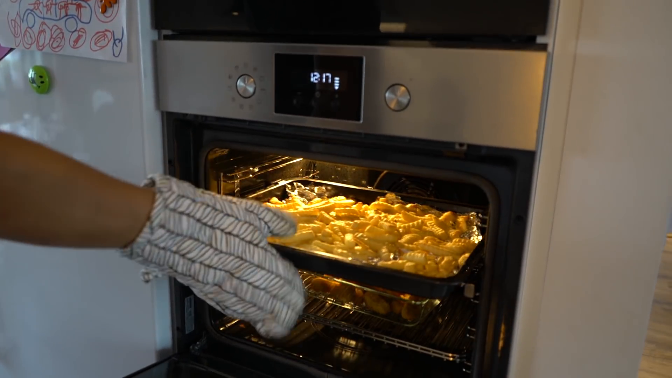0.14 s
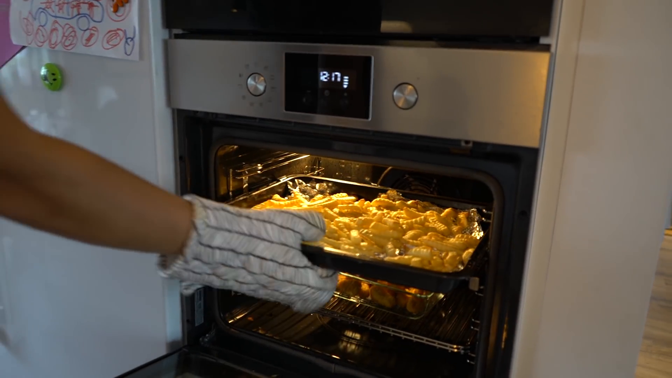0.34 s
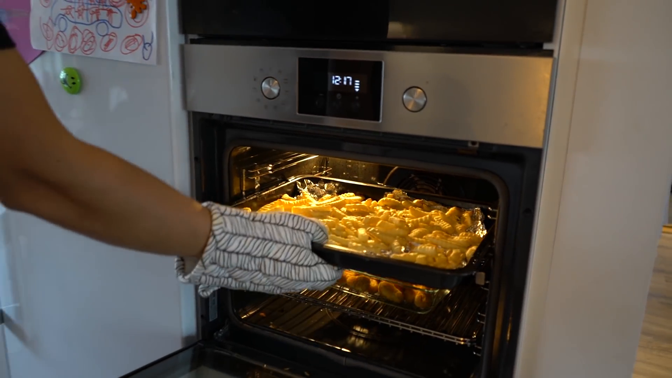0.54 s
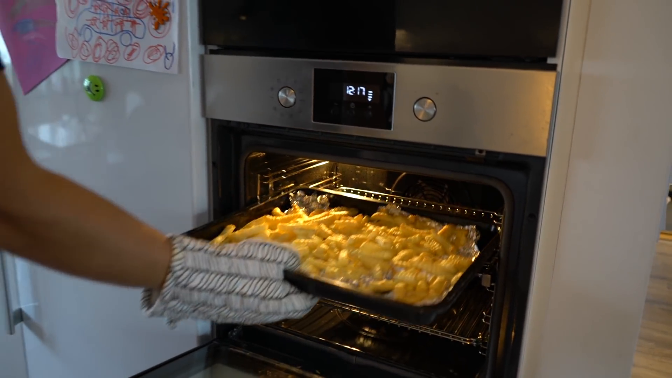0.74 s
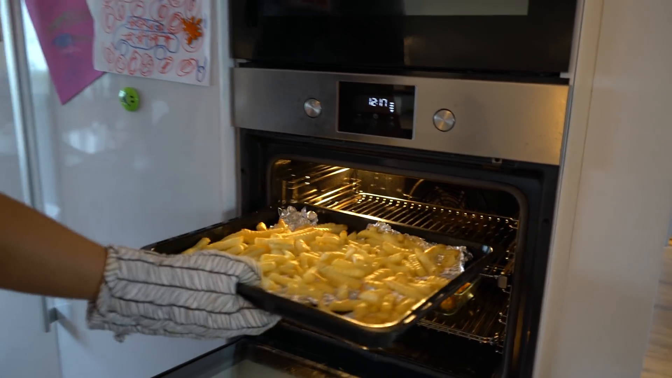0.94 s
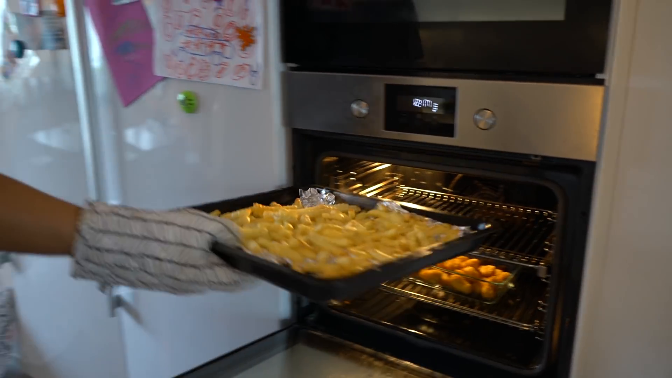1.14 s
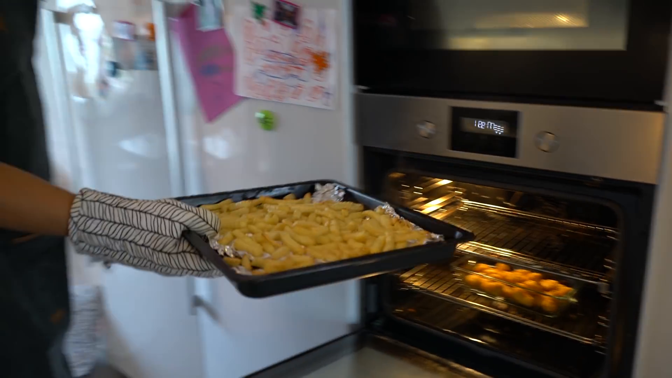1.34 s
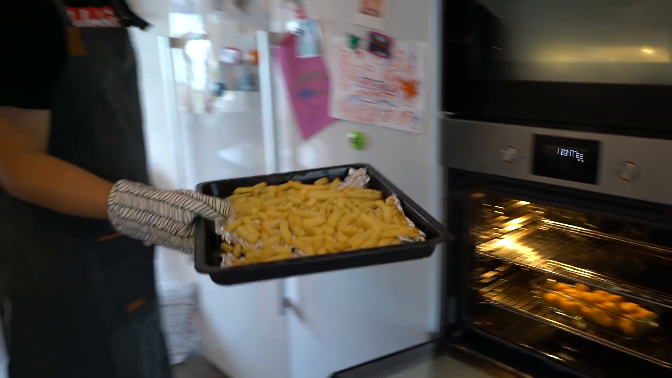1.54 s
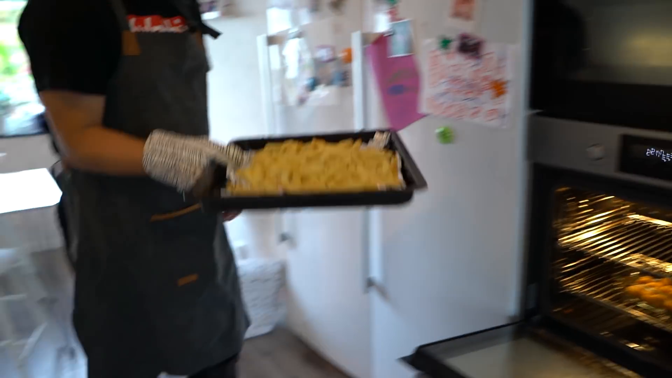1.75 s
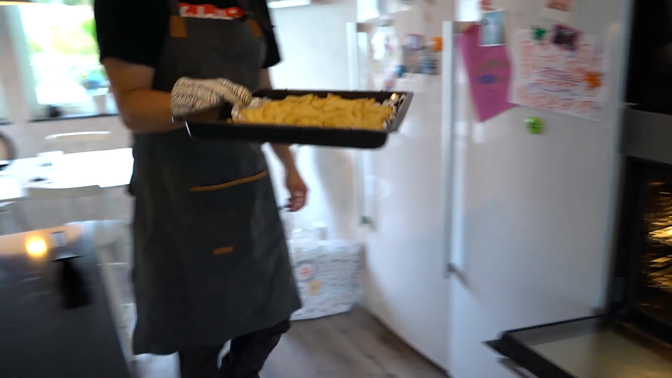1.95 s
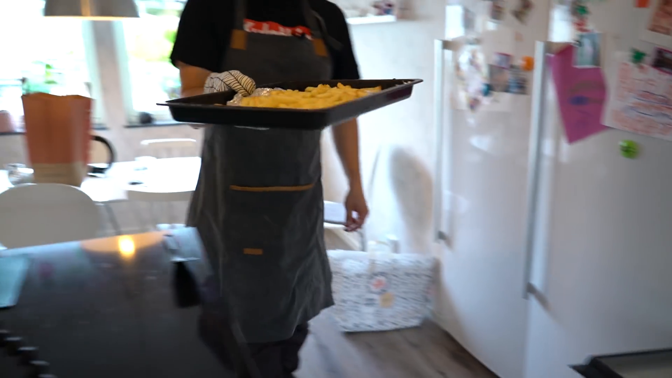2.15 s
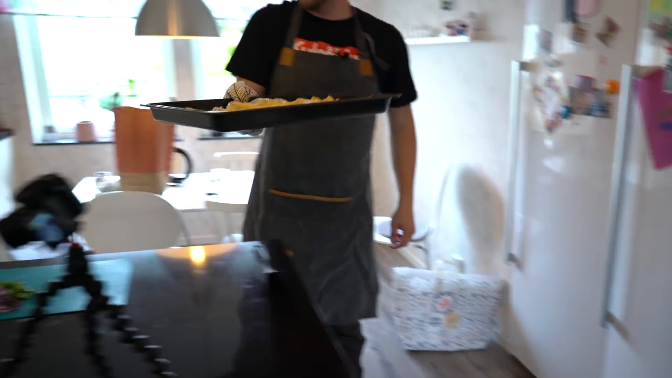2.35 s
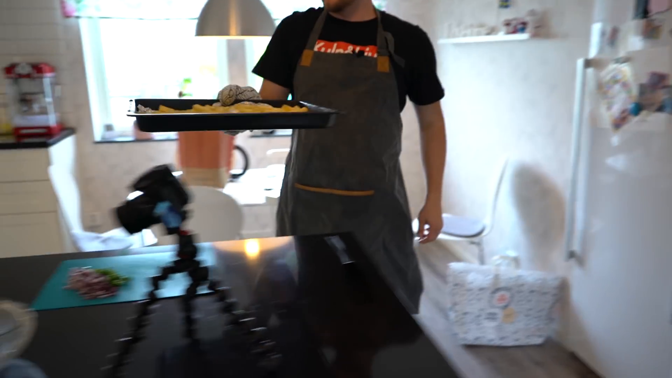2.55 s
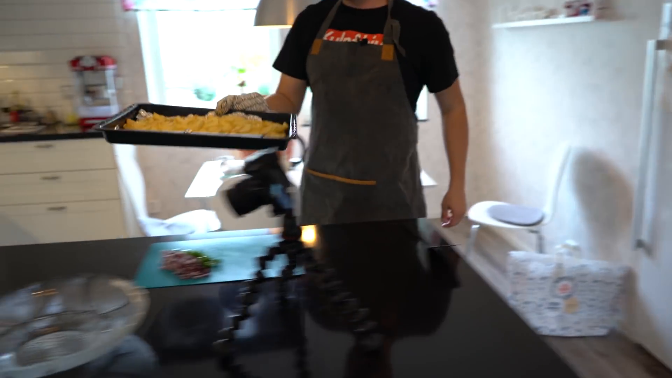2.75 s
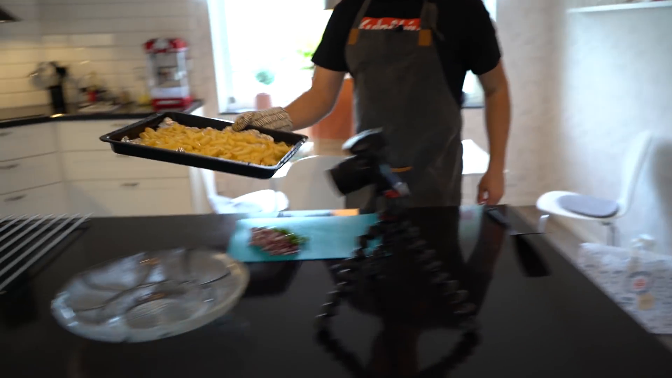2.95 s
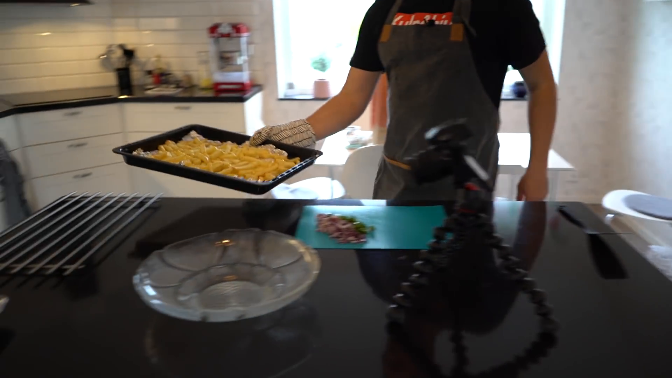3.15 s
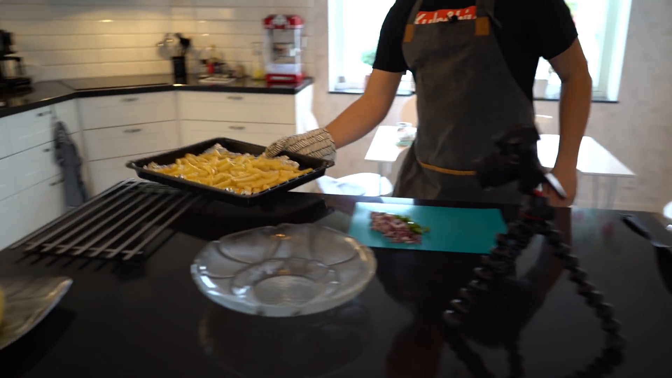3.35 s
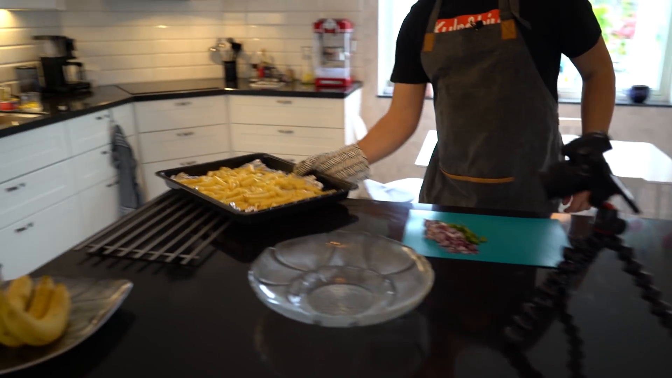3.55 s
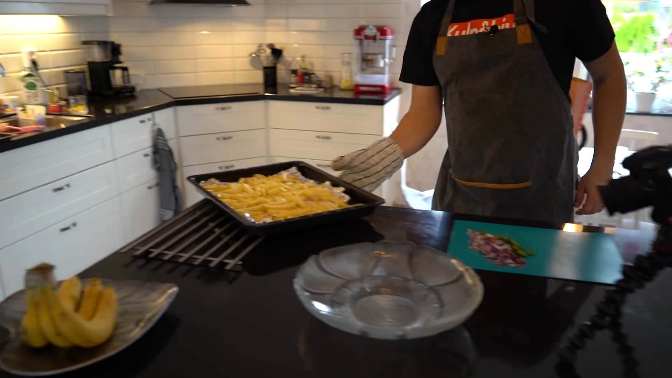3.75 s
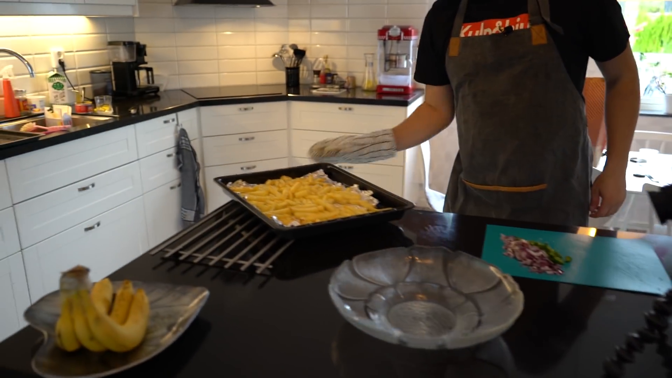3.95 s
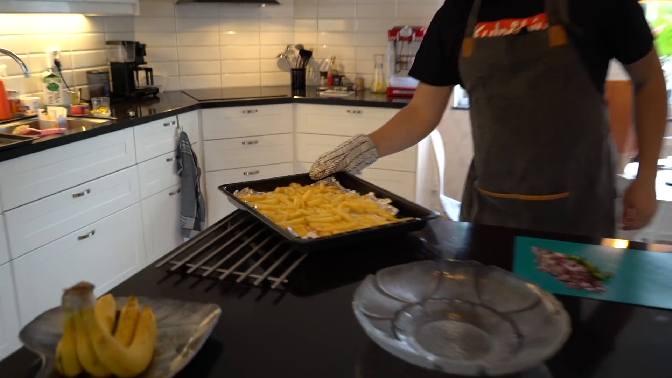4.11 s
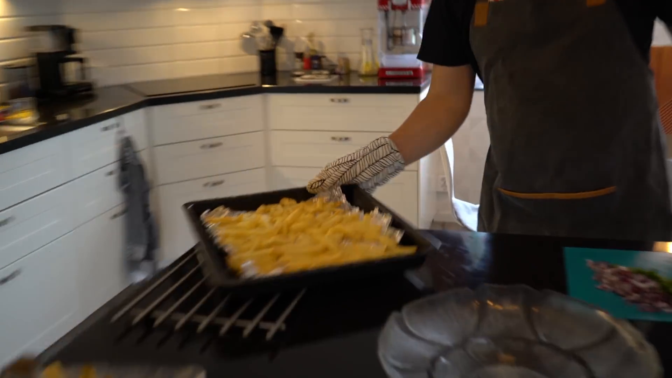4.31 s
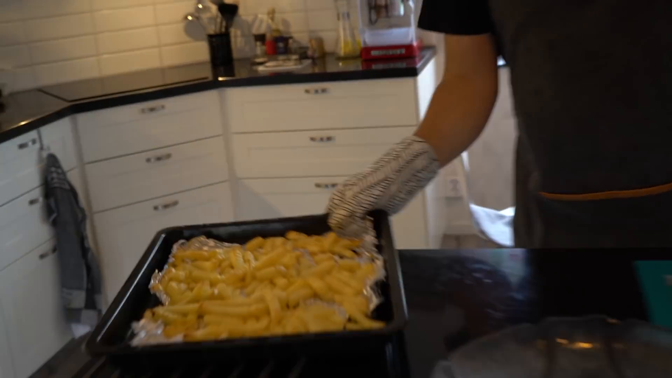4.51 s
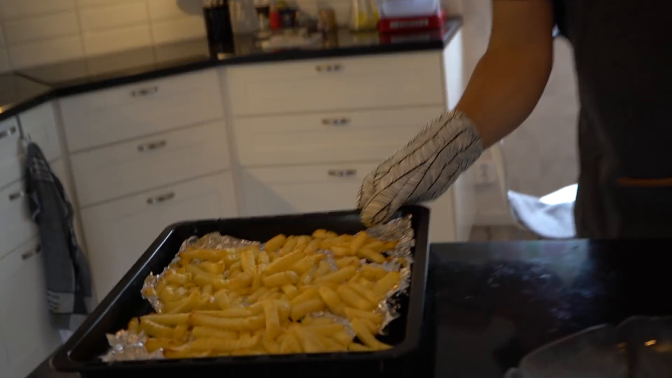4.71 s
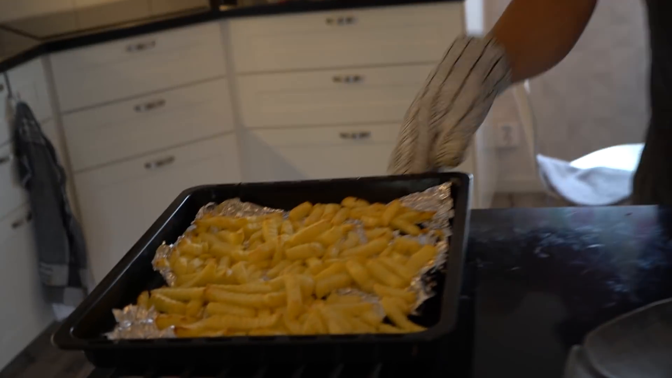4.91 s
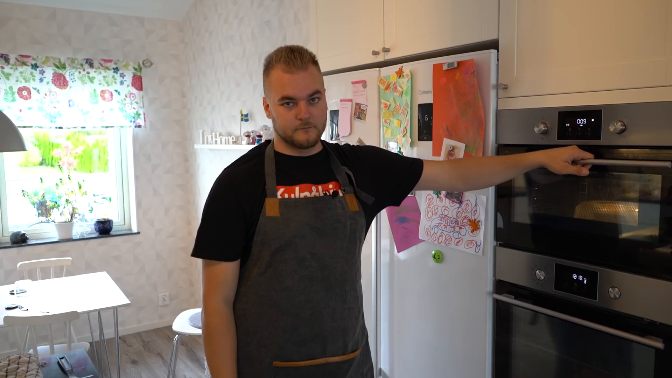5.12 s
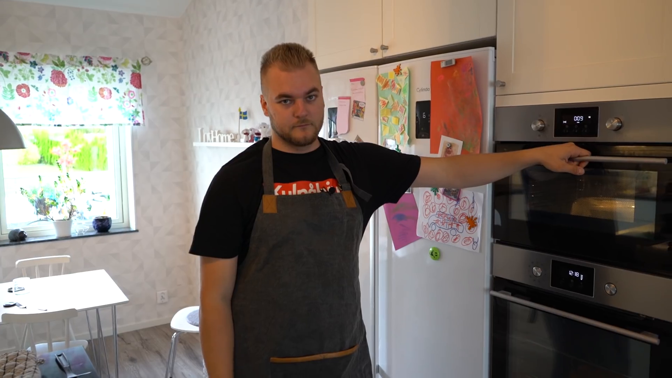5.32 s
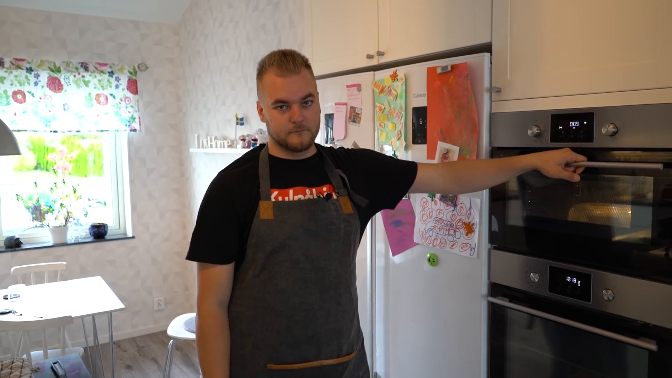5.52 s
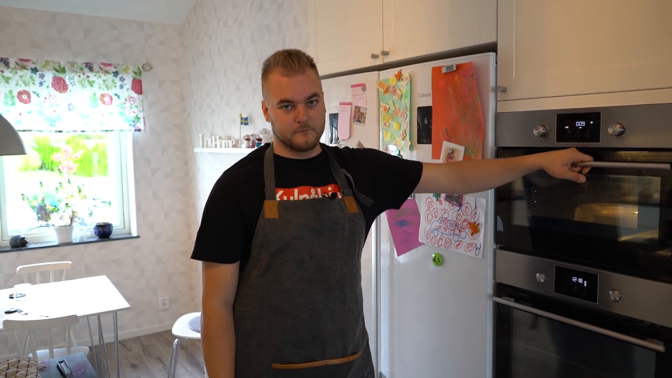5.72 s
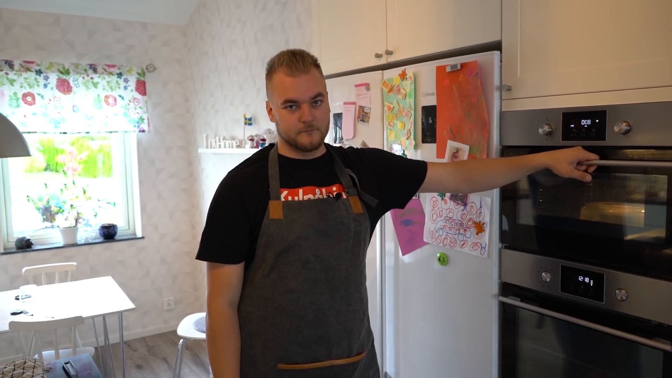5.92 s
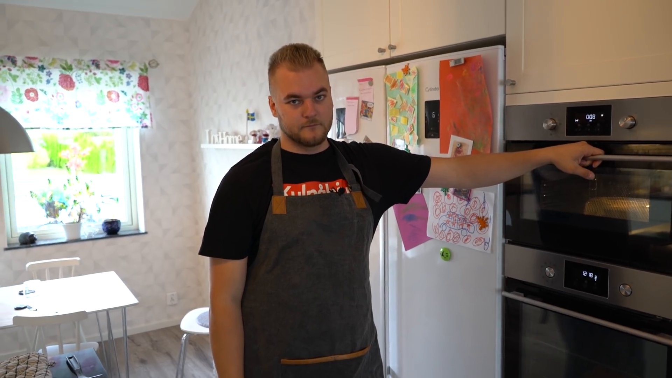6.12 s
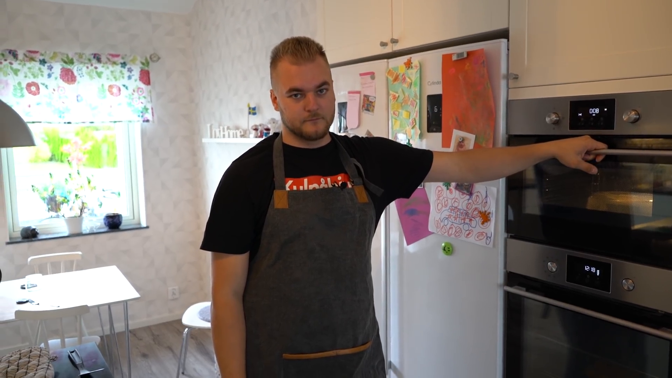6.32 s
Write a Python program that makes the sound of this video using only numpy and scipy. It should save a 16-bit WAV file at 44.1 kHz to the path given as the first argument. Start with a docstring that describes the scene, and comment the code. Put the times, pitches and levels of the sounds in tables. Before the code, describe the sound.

An oven fan hums in a kitchen with hard, slightly echoing surfaces, the microphone close to a steel baking tray. Right at the start the tray is jolted loose with a quick cluster of ringing knocks. From about 0.7 to 1.1 seconds it scrapes along the runners with tiny squeals, followed by short scuffs and foil crinkles until 1.4 seconds. It is then carried with faint sizzling fat, apron swishes and soft footsteps while the oven fan recedes. At about 3.5 seconds the tray lands on a metal trivet with a ringing clatter, the loudest moment, and rocks until 4 seconds. At 4.4 seconds it grates across the bars, with a weaker shove at 4.8 and light rim taps. At about 5.1 seconds the sound changes abruptly to a running microwave, a quiet, steady low hum under a cooling fan, lasting to the end just after 6 seconds.

```python
"""A kitchen with hard cupboards and tiles, the microphone close to a foil-lined steel baking tray.
Jolted loose in the oven, the tray rings, scrapes along its runners and is carried off, fat sizzling,
with apron swishes and soft steps. It clatters onto a metal trivet and grates as it is pushed into place.
Behind it the air and hum of the oven fan fall back with distance. Then the scene changes abruptly
to a running microwave: transformer hum under a cooling fan."""
import sys
import numpy as np
from scipy import signal
from scipy.fft import rfft, irfft
from scipy.io import wavfile
from scipy.ndimage import uniform_filter1d

SR = 44100
rng = np.random.default_rng(int(sys.argv[2]) if len(sys.argv) > 2 else 0)


def transcribe(u):
    """Save the signal u as a 16-bit wav file named by the first command-line argument.

    u: samples, shape (n,) or (channels, n), limited to [-1, 1]; the rate is SR.
    q: integer samples, one column per channel.
    """
    v = np.clip(np.atleast_2d(u).T, -1, 1)
    q = np.round(v * 32767).astype(np.int16)
    wavfile.write(sys.argv[1], SR, q)


N = 285282
T = np.arange(N) / SR
RING_T = T[:SR]

# tray knocking on the runners, then landing and rocking on the trivet: t/s, ring/dB, crack/dB, thump/dB
OVEN_BLOWS = [(.001, -36, -44, -30.5), (.088, -30.5, -30.5, -30.5), (.097, -25, -26, -28),
              (.104, -26.5, -27.5, -32), (.118, -21, -31, -19.5), (.157, -25, -24, -33),
              (.205, -32, -34, -55), (.268, -36, -36, -35), (.357, -36.5, -40.5, -72),
              (.729, -37, -50, -37)]
TRIVET_BLOWS = [(3.548, -13.5, -24.5, -31.5), (3.5665, -24.5, -33.5, -31.5), (3.6105, -44, -32, -48),
                (3.627, -33, -34, -37), (3.6645, -24, -26.5, -40), (3.672, -22.5, -28.5, -27),
                (3.705, -29.5, -33, -39), (3.742, -40, -35.5, -37.5), (3.871, -35, -33.5, -41),
                (3.911, -39, -36, -40), (3.923, -39.5, -47, -48), (3.9635, -52, -43.5, -55),
                (3.982, -43.5, -43, -43), (4.392, -33, -32.5, -54)]
# modes of the tray on runners and on trivet, and of hollow cabinet and worktop: f/Hz, level/dB, t60/s
OVEN_MODES = [(408, 4, 0.25), (466, 0.5, 0.33), (697, -3.5, 0.16), (812, -1.5, 0.28), (897, 1.5, 0.43),
              (1364, -18, .2), (1990, -10, 0.093), (2160, -2, 0.12), (2563, -1.5, 0.064),
              (2790, -14.5, 0.11), (2880, -14, .14)]
TRIVET_MODES = [(514, -14, 0.63), (573, -7, 0.64), (620, -32, 0.42), (714, 5, 0.29), (759, 2.5, 0.18),
                (797, -8.5, 0.22), (894, -2, 0.48), (907, -14, 0.25), (1120, -6.5, 0.38),
                (1295, -3.5, 0.08), (1350, -2, 0.48), (1523, -4, 0.23), (1560, -16, .25),
                (1680, -1.5, 0.11), (1800, -12.5, 0.28), (2040, -3, 0.21), (2130, -12, 0.25),
                (2620, -3.5, 0.51)]
BOX_MODES = [(73.6, 9, 0.2), (149, -1, 0.19), (230.9, -3, 0.32)]
# spectra of a blow (weak sheet modes, hard contact edge, cabinet or worktop below): f/Hz, level/dB
SHEET_COLOUR = [(150, -21), (350, -9.5), (550, -4), (800, -2.5), (1100, -7), (1600, -9), (2200, -5.5),
                (2650, -6.5), (3100, -14), (6000, -41), (15000, -60)]
CRACK_COLOUR = [(1200, -37), (2600, 1.5), (3500, 1), (5400, 1.5), (8000, 2), (12000, -5.5), (14000, -12.5),
                (15500, -25)]
THUMP_COLOUR = [(20, -23), (50, 3), (75, -1.5), (115, -7.5), (150, 3), (190, -4.5), (250, -12), (320, -16),
                (700, -37), (5000, -75)]
# resonances of rim and wire runners as they scrape: f/Hz, width/Hz, level/dB
RUNNER_PEAKS = [(890, 71, 3), (1180, 130, -5), (1445, 110, 0), (1900, 130, 6), (2090, 92, 6.5),
                (2360, 120, 5), (2580, 150, 2), (3060, 180, 1), (4170, 580, -3), (6800, 650, -11),
                (8440, 340, -15)]
# runner squeals: t/s, f/Hz, level/dB, half length/s
SQUEALS = [(0.968, 1983, -37, 0.022), (1.047, 7140, -34, .012), (1.063, 8750, -41, .012)]
# shoves across the trivet: t/s, level/dB, time to rest/s
SHOVES = [(4.395, -32, 0.47), (4.81, -42.5, 0.21)]
# rubs of underside, foil and mitt: peak t/s, level/dB, rise/s, fall/s
RUBS = [(1.172, -30.5, .05, 0.013), (1.298, -24, .038, 0.021), (1.38, -33.5, 0.024, 0.034),
        (4.24, -46.5, 0.11, 0.034), (4.406, -29, 0.033, 0.089), (4.656, -41, .07, 0.041)]
# friction spectra of runners, rubs and trivet bars: f/Hz, level/dB
RUNNER_COLOUR = [(250, -0.5), (800, -1), (1300, -4), (2200, -6.5), (3500, -5), (5500, -3.5), (7500, 0.5),
                 (9500, -6.5), (13000, -15), (15500, -43)]
SCUFF_COLOUR = [(500, -3), (1100, -9.5), (2200, -5.5), (3200, -6.5), (4500, -3.5), (7000, -3),
                (10000, -4.5), (13500, -12), (15500, -25)]
GRATE_COLOUR = [(200, -12), (330, -2.5), (550, -16), (720, 5), (900, -2), (1250, 4.5), (1600, -2.5),
                (2200, 3), (2650, -4), (3200, -8.5), (6000, -32)]
# small contacts (rim nudged and let go, foil crinkling, feet on the floor): t/s, level/dB
RIM_TAPS = [(4.249, -40.5), (4.3035, -42.5), (4.801, -42), (5.0585, -40)]
CRINKLES = [(.778, -42.5), (1.166, -37.5), (1.2135, -42), (1.226, -44), (1.296, -33.5)]
FOOTFALLS = [(1.78, -54), (2.39, -43), (2.74, -39.5), (2.88, -37), (3.28, -38), (3.38, -40)]
# their spectra: f/Hz, level/dB
RIM_COLOUR = [(250, -12), (550, .5), (950, 3), (1400, -3), (1850, 1.5), (2400, -3), (3300, -11),
              (8000, -14.5), (12000, -24), (15000, -33)]
CRINKLE_COLOUR = [(3000, -32), (6500, 11), (10500, 10), (15500, -10)]
FOOT_COLOUR = [(25, 3.5), (40, -12), (70, -2), (120, -39), (400, -52)]
# apron swishes: t/s, level/dB, half length/s
SWISHES = [(2.21, -51.5, 0.067), (2.69, -53, 0.088), (3.183, -46.5, 0.064), (3.374, -55, 0.039)]
# spectra of apron cloth and of hot fat and foil: f/Hz, level/dB
SWISH_COLOUR = [(250, -11), (700, 1), (1500, -2.5), (2600, -6), (4200, -7), (9000, -18), (15000, -45)]
SIZZLE_COLOUR = [(1500, 4), (4000, -5), (8000, 0), (11000, -2.5), (14000, -12), (16000, -40)]
# the open oven's direct sound at the microphone: t/s, level/dB
OVEN_NEARNESS = [(0, -1), (1, -2), (2.1, -6), (2.6, -11.5), (3.4, -9)]
# air spectra of the two fans: f/Hz, level/dB
OVEN_AIR = [(12, -4.5), (20, -1.5), (66, -8.5), (103, -7.5), (132, -13), (367, -16), (470, -19),
            (525, -19.5), (674, -20.5), (1310, -29), (1420, -29.5), (1880, -35), (8380, -42.5),
            (15000, -50)]
MICROWAVE_AIR = [(20, 0.5), (45, 4.5), (110, 0), (160, -5), (430, -5.5), (650, -11.5), (1100, -17.5),
                 (1450, -13), (2200, -20.5), (3400, -29), (5500, -34), (12000, -36.5), (16000, -46)]
# transformer harmonics: multiple of HUM_HZ, level/dB
MICROWAVE_HUM = [(1, -45.5), (3, -58.5), (7, -61), (9, -65)]
# spectra of the kitchen's dark and bright reverberation: f/Hz, level/dB
ROOM_LOW = [(30, .5), (2000, -9), (6000, -10.5), (16000, -26)]
ROOM_HIGH = [(1500, 5.5), (5000, 2), (16000, 4.5)]

PULL_PEAK_S, LIFT_OFF_S, MICROWAVE_S = .867, 1.068, 5.085
CONTACT_HZ, HARDNESS_DB_PER_OCTAVE = 4300, 10.5  # more crack than ring: a harder, brighter blow
CHATTER_S = .0085  # decay of a loose tray's rebounds
HUM_HZ = 100.4


def blows(rows, modes, sheet_db, sheet_t60, thump_t60, box_db, choke_db, choke_s, pin_db):
    """Close up, each blow rings the tray, cracks and thumps; above pin_db it hardly rebounds."""
    out = np.zeros(N)
    choke = 1 + undb(choke_db) * np.exp(-RING_T / choke_s)  # load and mitt stop the first wide swing
    for s, ring_db, crack_db, thump_db in rows:
        contact_hz = CONTACT_HZ * 2 ** ((crack_db - ring_db) / HARDNESS_DB_PER_OCTAVE)
        chatter_s = CHATTER_S / (1 + undb(ring_db - pin_db) ** 2)
        clang = tray(modes, sheet_db, sheet_t60) * choke
        box = energy(burst(THUMP_COLOUR, thump_t60)) + undb(box_db) * ring(BOX_MODES, scatter_db=3)
        add(out, s, undb(ring_db) * strike(soften(clang, contact_hz), chatter_s))
        add(out, s, undb(crack_db) * strike(burst(CRACK_COLOUR, t60=.12), chatter_s))
        add(out, s, undb(thump_db) * strike(box * (1 - fade(.0064)), chatter_s))
    return out


def tray(modes, sheet_db, sheet_t60):
    """Strong modes over a crowd of weak ones; a thin sheet radiates little bass."""
    steel = ring(modes, scatter_db=1.9) + undb(sheet_db) * energy(burst(SHEET_COLOUR, sheet_t60))
    return energy(signal.sosfilt(signal.butter(2, 330, "high", fs=SR, output="sos"), steel))


def runner_scrape():
    """The rim scrapes along the runners until it lifts clear; resonances come and go as it travels."""
    force = slips(rate=4000, jerk_db=1.2)
    rings = np.zeros(N)
    for hz, width, db in RUNNER_PEAKS:
        resonance = unit(signal.lfilter(*signal.iirpeak(hz, hz / width, SR), force))
        rings += undb(db + 1.8 * walk(13.3)) * resonance
    grit = undb(-1.5) * colour(force, RUNNER_COLOUR)
    pull = swell(PULL_PEAK_S, rise_s=.071, fall_s=.27)
    contact = np.exp(-np.maximum(T - LIFT_OFF_S, 0) / .023)
    return undb(-29) * unit(unit(rings) + grit) * pull * contact


def runner_squeals():
    """For a moment the slips lock onto one resonance, wavering in pitch."""
    out = np.zeros(N)
    for s, hz, db, half_s in SQUEALS:
        pitch = hz * (1 + .0364 * walk(300))
        out += undb(db) * bump(s, half_s) * np.sin(2 * np.pi * np.cumsum(pitch) / SR)
    return out


def trivet_grate(attack_s=.021, speed_power=1.44):
    """The base grates over bars that damp its ring; friction brakes each shove evenly."""
    sliding = np.zeros(N)
    for s, db, length_s in SHOVES:
        speed = np.clip(np.minimum((T - s) / attack_s, 1 - (T - s) / length_s), 0, 1)
        sliding += undb(db) * speed ** speed_power
    return colour(slips(rate=2500, jerk_db=3.5), GRATE_COLOUR) * sliding


def scuff():
    """The fine grit of metal, foil and cloth rubbing."""
    grit = colour(slips(rate=16000, jerk_db=-2.5), SCUFF_COLOUR)
    return grit * sum(undb(db) * swell(s, rise_s, fall_s) for s, db, rise_s, fall_s in RUBS)


def taps(rows, points, t60):
    """Small single contacts of one colour."""
    out = np.zeros(N)
    for s, db in rows:
        add(out, s, undb(db) * strike(burst(points, t60), chatter_s=0))
    return out


def carrying():
    """Fat sizzles in the oven and on the tray; strides swish the apron and rustle the foil; feet thud."""
    strides = sum(undb(db) * bump(s, half_s) for s, db, half_s in SWISHES)
    screen = undb(np.interp(T, [PULL_PEAK_S, LIFT_OFF_S], [-6.5, 0]))  # the tray clears the oven walls
    fat = np.hypot(undb(-53) * nearness(), undb(-61)) * screen  # the oven recedes, the tray stays close
    foil = undb(-7) * strides
    hiss = colour(rng.standard_normal(N), SIZZLE_COLOUR) * undb(.71 * walk(41.3))
    apron = strides * colour(grains(rate=9000), SWISH_COLOUR)
    feet = soften(taps(FOOTFALLS, FOOT_COLOUR, t60=.13), hz=150)
    return hiss * np.hypot(fat, foil) + apron + feet


def microwave():
    """Transformer hum with odd harmonics under a cooling fan, at a steady distance."""
    hum = sum(undb(db) * mains(multiple) for multiple, db in MICROWAVE_HUM)
    return hum + undb(-46) * colour(rng.standard_normal(N), MICROWAVE_AIR)


def oven_fan():
    """Direct air and hum recede from the microphone; some air is heard all over the kitchen."""
    air = colour(rng.standard_normal(N), OVEN_AIR) * undb(.7 * walk(6))
    near = nearness()
    direct, diffuse = undb(-40.5) * near, undb(-45.5)
    return air * np.hypot(direct, diffuse) + undb(-38.5) * near * mains(1)


def nearness():
    """Gain of the oven's direct sound as the microphone follows the tray away."""
    return undb(np.interp(T, *np.transpose(OVEN_NEARNESS)))


def mains(multiple):
    """One harmonic of a transformer or motor hum, wavering a little in phase."""
    phase = 2 * np.pi * (multiple * HUM_HZ * T + rng.random())
    return np.sqrt(2) * np.sin(phase + .067 * walk(3.9))


def kitchen(x, wet_db, low_t60, high_t60):
    """Nearby cupboards and tiles answer within a few milliseconds; the treble dies first."""
    reflections = burst(ROOM_LOW, low_t60) + undb(6) * burst(ROOM_HIGH, high_t60)
    onset = np.clip((RING_T - .004) / .0054, 0, 1)
    return x + undb(wet_db) * signal.fftconvolve(x, energy(reflections * onset))[:N]


def strike(response, chatter_s):
    """A contact and its quick rebounds drive a response; rms 1 over the first 30 ms."""
    t = RING_T[:SR // 10]
    rebounds = (rng.random(len(t)) < 900 / SR) * rng.standard_normal(len(t))
    force = .5 * rebounds * np.exp(-t / max(chatter_s, .0005))
    force[0] = 1
    x = signal.fftconvolve(force, response)
    return x / np.sqrt(np.mean(x[:SR * 3 // 100] ** 2))


def ring(modes, scatter_db):
    """Modes that start together; each point of contact weights them anew."""
    out = np.zeros(SR)
    for hz, db, t60 in modes:
        mode = energy(np.sin(2 * np.pi * hz * RING_T) * fade(t60))
        out += undb(db + scatter_db * rng.standard_normal()) * mode
    return energy(out)


def burst(points, t60):
    """Countless close modes dying together."""
    return colour(rng.standard_normal(SR), points) * fade(t60)


def soften(x, hz):
    """A longer contact barely drives the modes above hz."""
    return signal.sosfilt(signal.butter(2, min(hz, .45 * SR), fs=SR, output="sos"), x)


def slips(rate, jerk_db):
    """Stick and slip, never even."""
    return grains(rate) * undb(jerk_db * walk(45))


def grains(rate):
    """Tiny slips at random moments, a few larger than the rest."""
    size = undb(2 * np.minimum(rng.exponential(size=N), 4))
    return unit((rng.random(N) < rate / SR) * size * rng.standard_normal(N))


def swell(peak_s, rise_s, fall_s):
    """Gain of one stroke of the hand: it grows to a peak and dies away."""
    return np.exp(-np.maximum((peak_s - T) / rise_s, (T - peak_s) / fall_s))


def bump(s, half_s):
    """Bell-shaped gain around time s."""
    return np.exp(-.5 * ((T - s) / half_s) ** 2)


def fade(t60):
    """Exponential decay, one second long."""
    return np.exp(-np.log(1000) * RING_T / max(t60, .005))


def walk(rate):
    """Random levels that change rate times a second, joined smoothly."""
    hold = int(SR / rate)
    steps = np.repeat(rng.standard_normal(N // hold + 1), hold)
    return .9 * uniform_filter1d(steps, hold)[:N]


def colour(x, points):
    """Filter by a spectrum of f/Hz, level/dB points; rms 1."""
    hz, db = np.transpose(points)
    f = np.maximum(np.fft.rfftfreq(len(x), 1 / SR), 1)
    skirt = np.minimum(f / hz[0], 1) ** 2
    gain = undb(np.interp(np.log(f), np.log(hz), db))
    return unit(irfft(rfft(x) * skirt * gain, len(x)))


def add(out, s, x):
    """Mix x into out from time s."""
    i = max(int(s * SR), 0)
    out[i:i + len(x)] += x[:N - i]


def undb(db):
    """Decibels to gain."""
    return 10 ** (np.asarray(db) / 20)


def unit(x):
    """Scale to rms 1."""
    return x / np.sqrt(np.mean(x ** 2) + 1e-18)


def energy(x):
    """Scale to total energy 1."""
    return x / np.sqrt(np.sum(x ** 2))


def scene():
    """One microphone follows the tray from oven to trivet; then the microwave takes over."""
    jolt = blows(OVEN_BLOWS, OVEN_MODES, sheet_db=-1, sheet_t60=.29, thump_t60=.25,
                 box_db=-2.5, choke_db=13.5, choke_s=.014, pin_db=-1)
    landing = blows(TRIVET_BLOWS, TRIVET_MODES, sheet_db=2.5, sheet_t60=.85, thump_t60=.32,
                    box_db=-7, choke_db=10, choke_s=.019, pin_db=-28)
    foil = taps(CRINKLES, CRINKLE_COLOUR, t60=.014)
    leaving_oven = jolt + runner_scrape() + runner_squeals() + foil
    setting_down = landing + trivet_grate() + taps(RIM_TAPS, RIM_COLOUR, t60=.16)
    handling = leaving_oven + scuff() + carrying() + setting_down
    tray_scene = kitchen(handling, wet_db=-7.5, low_t60=.74, high_t60=.44) + oven_fan()
    change = np.clip((T - MICROWAVE_S) / .004, 0, 1)
    return (tray_scene * (1 - change) + microwave() * change)[None]


def record(dry):
    """The microphone signal is capped at full scale and cut above 15.6 kHz."""
    top_cut = signal.ellip(10, .2, 70, 15600, fs=SR, output="sos")
    return signal.sosfilt(top_cut, np.clip(dry, -1, 1))


dry = scene()
out = record(dry)
transcribe(out)
```